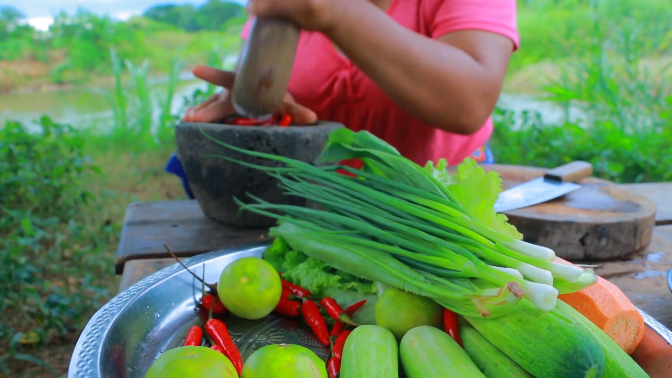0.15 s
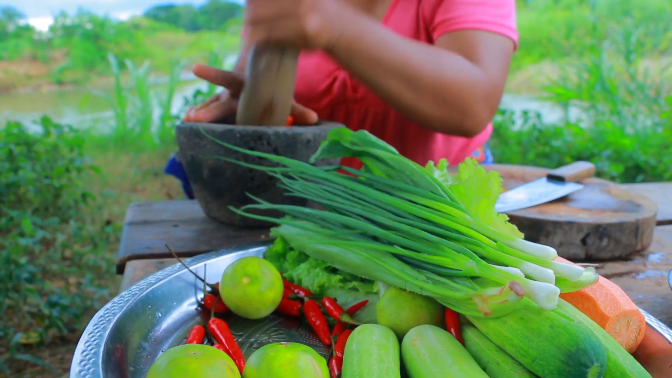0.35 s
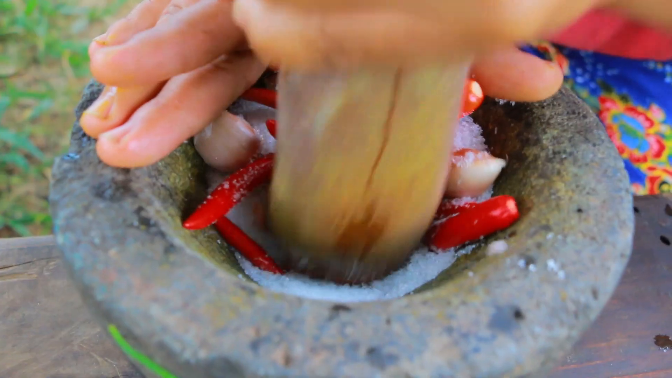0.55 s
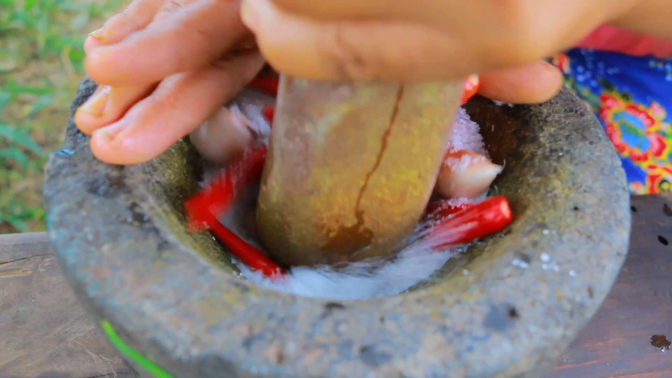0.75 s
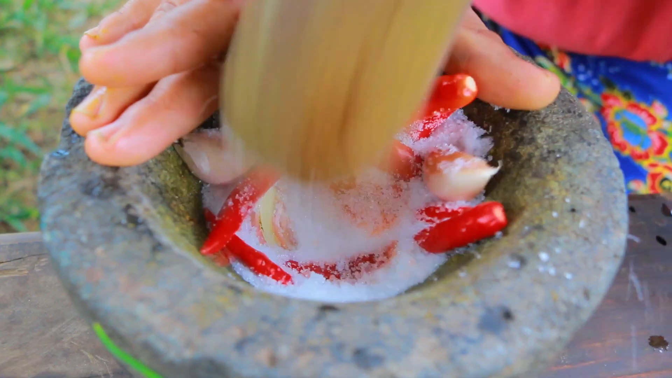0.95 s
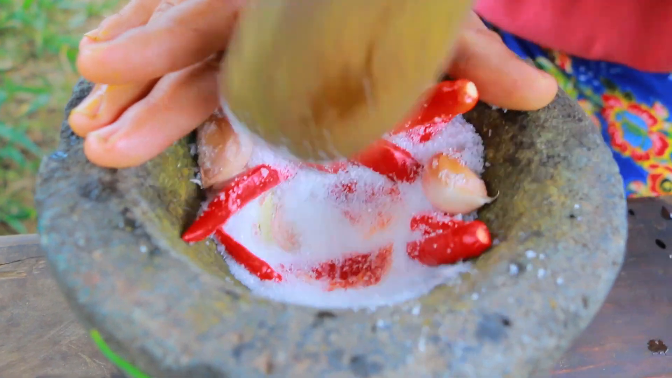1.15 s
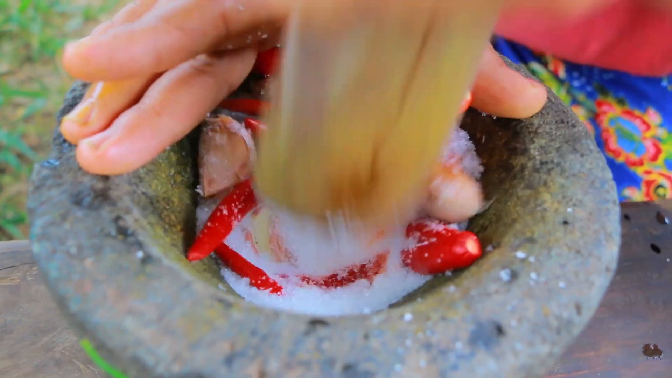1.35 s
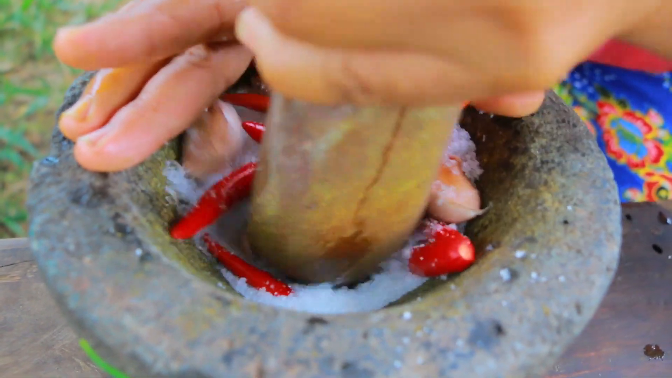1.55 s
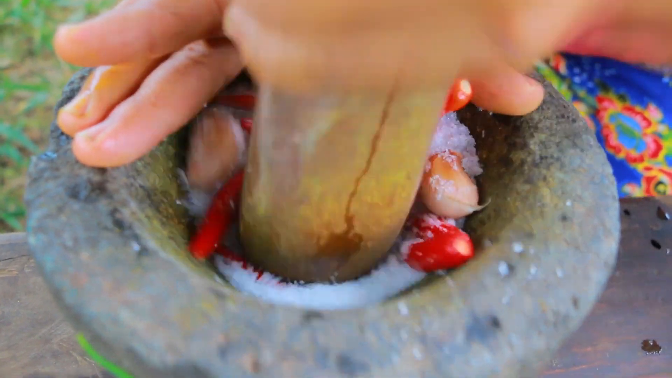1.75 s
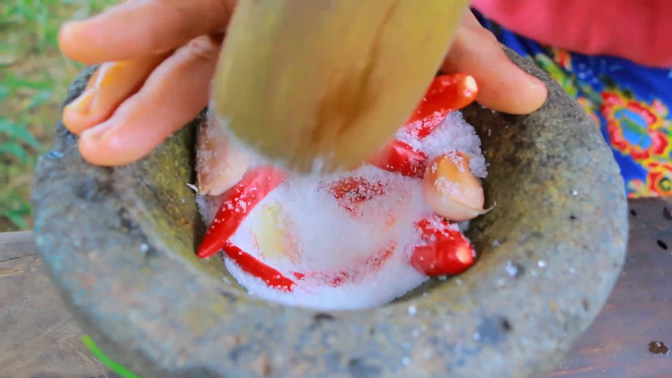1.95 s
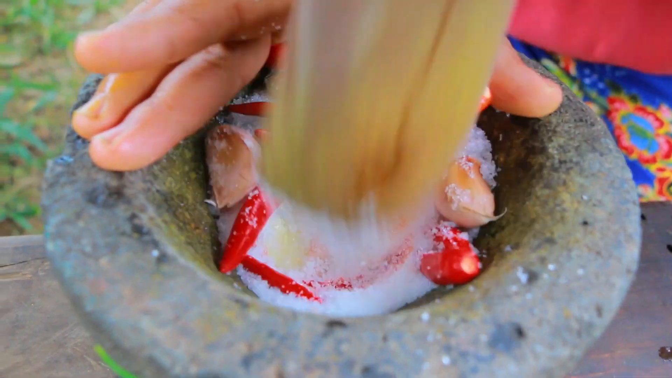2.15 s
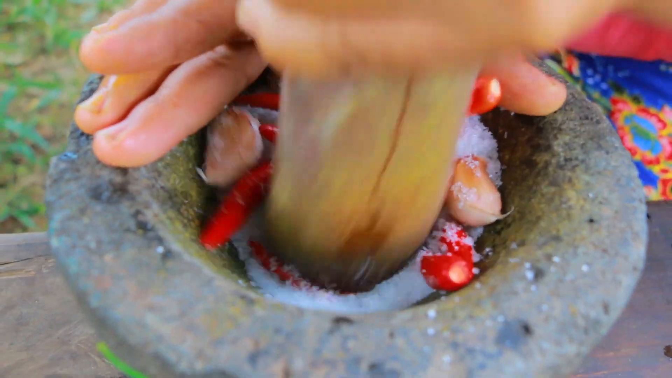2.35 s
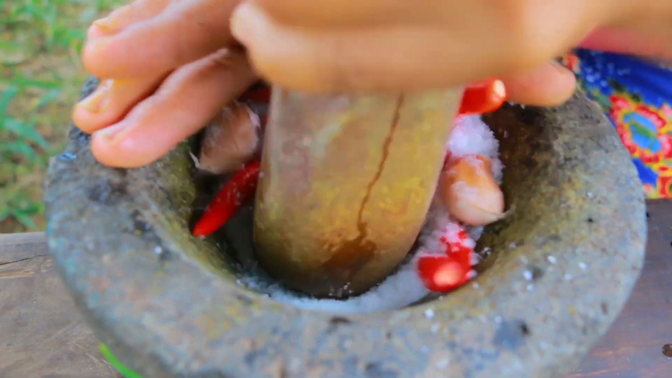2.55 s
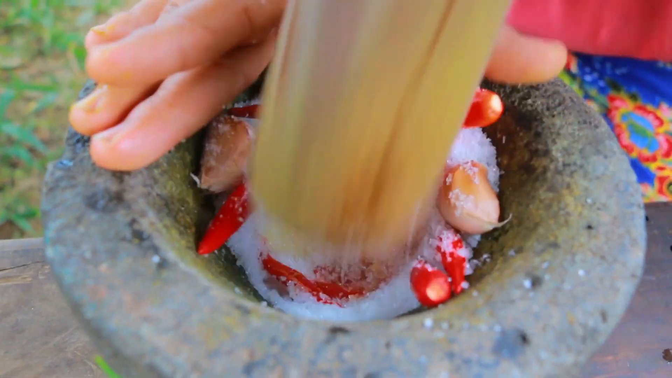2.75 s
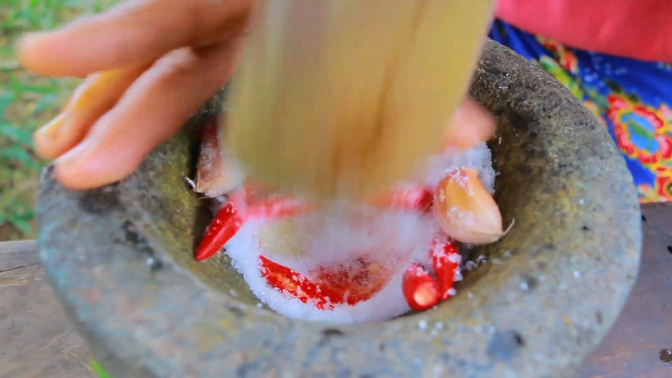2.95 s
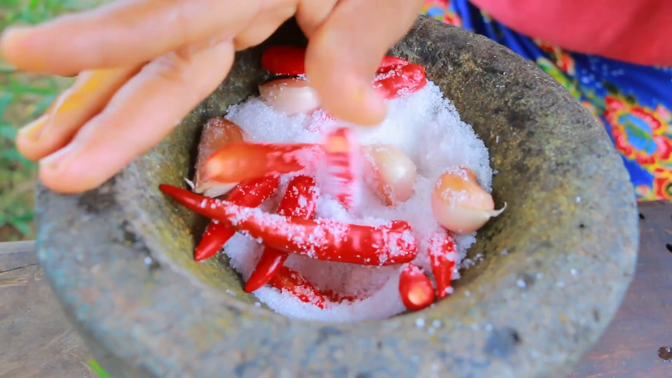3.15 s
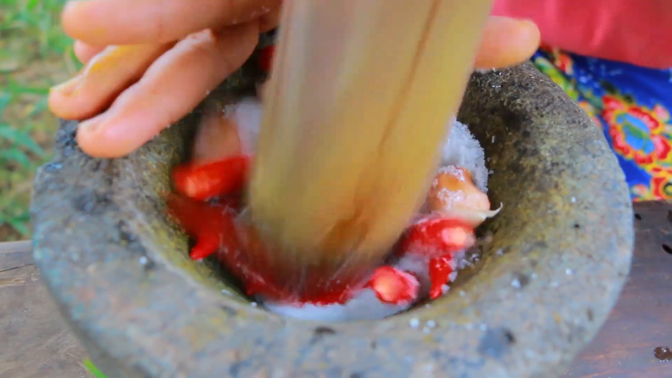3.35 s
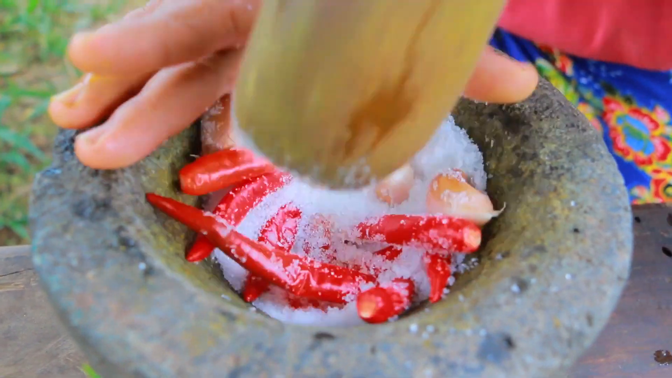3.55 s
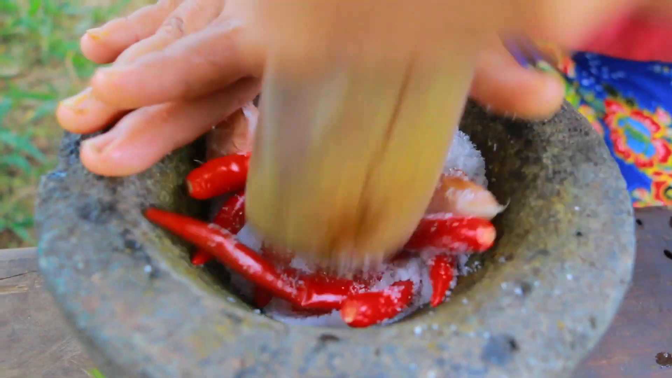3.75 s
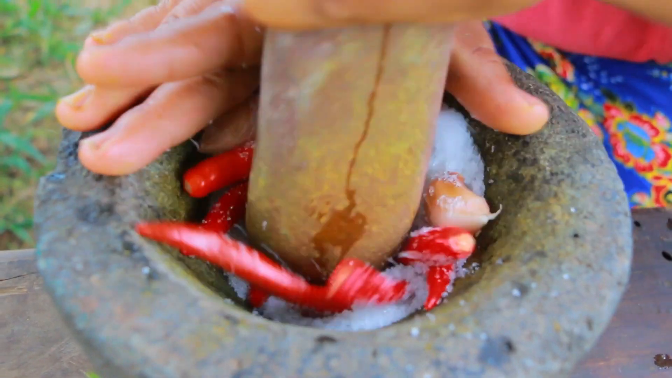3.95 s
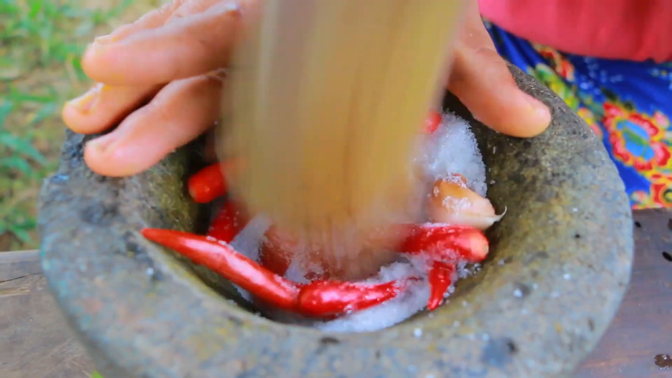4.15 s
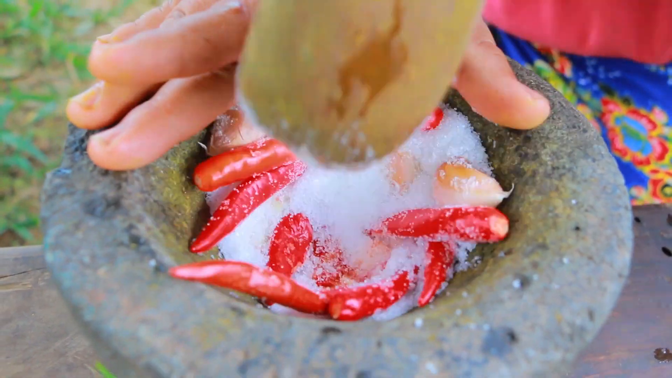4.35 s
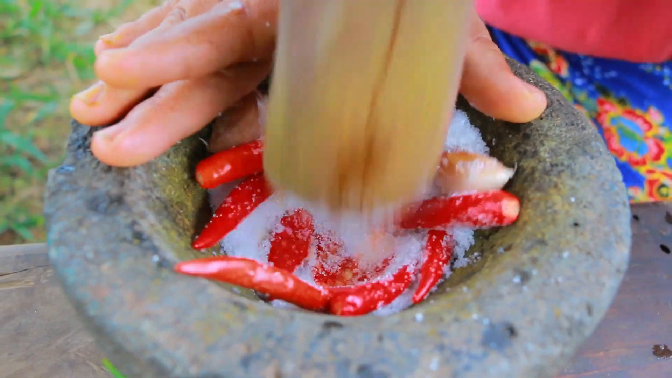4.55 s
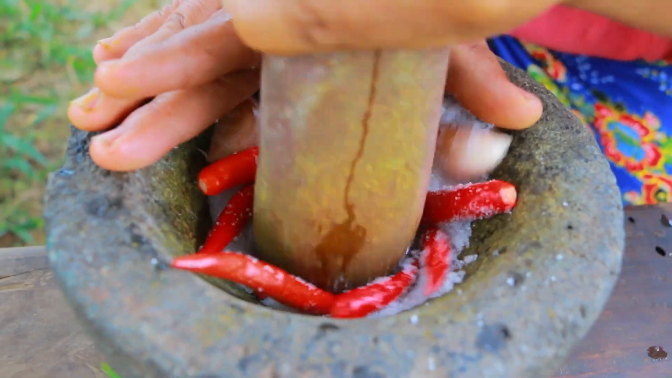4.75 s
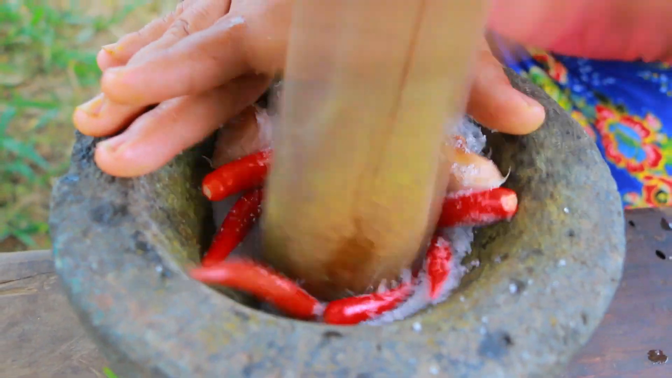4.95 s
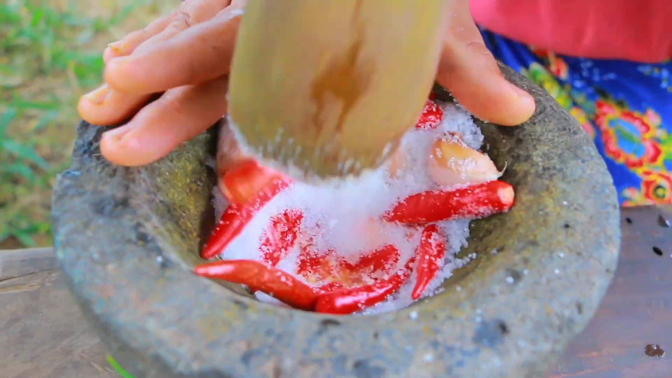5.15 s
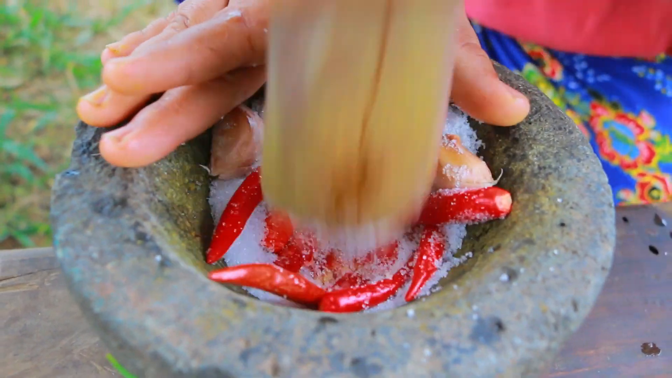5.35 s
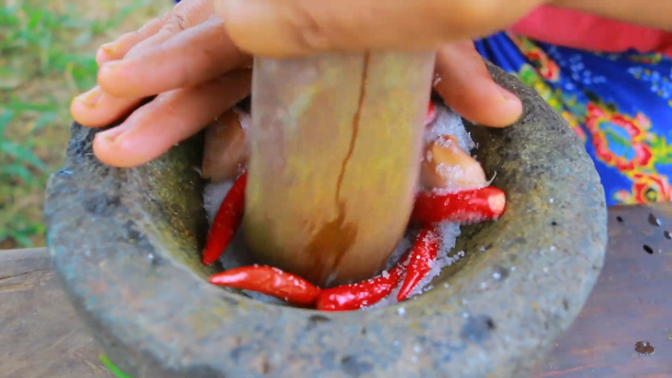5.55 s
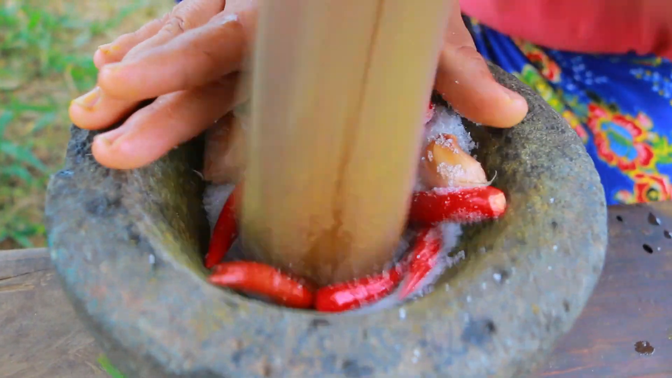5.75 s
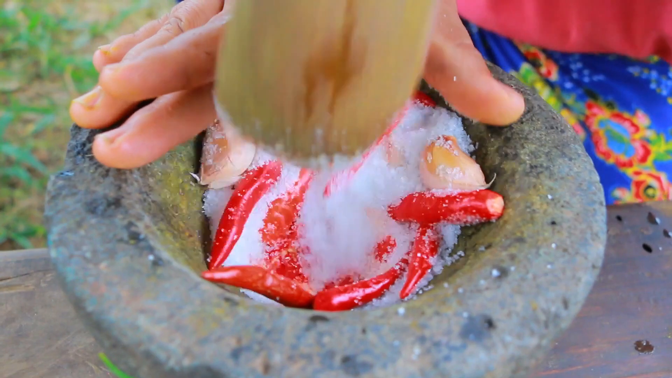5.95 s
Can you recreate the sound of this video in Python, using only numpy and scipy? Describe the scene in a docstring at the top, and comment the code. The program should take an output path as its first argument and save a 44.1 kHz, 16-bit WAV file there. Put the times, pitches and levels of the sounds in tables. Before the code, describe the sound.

Close stereo microphones, dry open air with a soft hush. Steady heavy blows of wood in stone: a short gritty salt burst, dull thump, hard woody knock, then planks booming and rattling, loose metal ticking. The first two are thinner and farther, cut by a very short silence. Around three seconds the pounding rests with low handling rumble and faint cricket, then continues strongly to the end, peaks slightly overloaded.

```python
"""A wooden pestle pounds chilies, garlic and salt in a stone mortar on a loose plank table out of doors. Close
to the microphones, each stroke is a burst of crushed salt (noise grains), a dull thump and a knock of mortar
and planks (struck resonators); the table shudders on and a small metal thing ticks (snap and ring). Far off,
narrow noise bands make a cicada and a cricket before the silence, then a throbbing cricket, over an outdoor
hush of shaped noise. A short silence falls near half a second; loud peaks pull the gain down and overload."""
import sys
import numpy as np
from scipy import signal
from scipy.fft import rfft, irfft, next_fast_len
from scipy.io import wavfile

SR = 44100
rng = np.random.default_rng(int(sys.argv[2]) if len(sys.argv) > 2 else 0)


def to_linear_factor(level_db):
    """Convert decibel levels (scalar or array-like) to linear amplitude factors."""
    exponent = np.asarray(level_db, float) / 20
    return 10 ** exponent


def unload_audio(sound):
    """Save the sound as a 16-bit wav file, at the path given as the first command line argument."""
    columns = np.transpose(np.atleast_2d(sound))
    # keep every value between -1 and 1, then stretch to whole-number steps
    steps = np.round(np.clip(columns, -1, 1) * 32767)
    wavfile.write(sys.argv[1], SR, steps.astype(np.int16))


N = 265482


def rms_one(x):
    """Scale to rms 1."""
    return x / np.sqrt(np.mean(x ** 2) + 1e-20)


def coloured(x, points, share=1):
    """Shape a spectrum by (Hz, dB) points joined on a log axis; share scales the dB."""
    hz, db = np.transpose(points)
    size = next_fast_len(N)
    grid = np.maximum(np.fft.rfftfreq(size, 1 / SR), 1)
    curve_db = np.interp(np.log(grid), np.log(hz), db)
    return irfft(rfft(x, size) * to_linear_factor(share * curve_db), size)[..., :N]


def clicks(seconds, sizes):
    """Impulses at given times."""
    out = np.full(N, 1e-18)
    places = np.round(np.asarray(seconds) * SR).astype(int)
    np.add.at(out, np.clip(places, 0, N - 1), sizes)
    return out


def ring(x, hz, t60):
    """A unit click sets a sine of height 1 ringing; it falls 60 dB in t60 seconds."""
    r, w = to_linear_factor(-60 / (t60 * SR)), 2 * np.pi * hz / SR
    return signal.lfilter([0, np.sin(w)], [1, -2 * r * np.cos(w), r * r], x)


def fade(x, t60):
    """Each click becomes a step that dies away by 60 dB in t60 seconds."""
    return signal.lfilter([1], [1, -to_linear_factor(-60 / (t60 * SR))], x)


def soften(x, hz):
    """A yielding contact: double one-pole low-pass."""
    r = np.exp(-2 * np.pi * hz / SR)
    return signal.lfilter([(1 - r) ** 2], [1, -2 * r, r * r], x)


def strike(seconds, db, modes, spread_db, chatter_s, dulling=0, count=4, shifts=(1,)):
    """Uneven surfaces touch several times in one hit, each mode getting its own strengths; soft hits are
    duller where dulling is set."""
    draw = rng.standard_normal((len(seconds), len(modes), count, 2))
    dealt = rng.integers(0, len(shifts), (len(seconds), len(modes), 1))
    late = abs(draw[..., 1]) * np.arange(count)
    favoured = draw[..., :1, 1]   # where the hit lands decides which modes it favours
    strength_db = spread_db * (0.32 * favoured + .5 * abs(draw[..., 0])) - 5.45 * late
    sizes = to_linear_factor(strength_db) * np.sign(draw[..., 0])
    out = 0
    for k, (hz, mode_db, t60) in enumerate(modes):
        times = seconds[:, None] + chatter_s * late[:, k]
        height = to_linear_factor(db + mode_db + dulling * db * np.log2(hz / 700))[:, None]
        for j, shift in enumerate(shifts):
            chosen = (dealt[:, k] == j) * sizes[:, k] * height
            out = out + ring(clicks(times, chosen), hz * shift, t60)
    return out


def grains(per_s, spread_db):
    """Random clicks of uneven size; rms 1."""
    sizes = to_linear_factor(abs(spread_db) * np.minimum(rng.exponential(1, N), 4)) * rng.choice([-1, 1], N)
    return rms_one(sizes * (rng.random(N) < per_s / SR))


# side signal against mid: pitch_hz, level_db
SIDE_DB = [(60, -16.5), (150, -27), (380, -23.5), (950, -9.5), (2380, -3), (5980, 1), (15000, -2.5)]
# left port against right: pitch_hz, level_db
BALANCE_DB = [(60, 0), (180, 0), (550, 2), (1650, -2), (4970, -2), (15000, -7.5)]


def at_microphones(x, turn, scattered):
    """Two spaced ports hear a source out of phase and with unlike close reflections, most of all in the treble."""
    close = rng.standard_normal(900) * to_linear_factor(-np.arange(900) * .06)
    reflections = signal.fftconvolve(x, close / np.linalg.norm(close))[:N]
    quarter_turn = signal.hilbert(x, next_fast_len(N)).imag[:N]
    side = coloured(turn * quarter_turn + scattered * reflections, SIDE_DB)
    left = coloured(x + side, BALANCE_DB, share=.5)
    right = coloured(x - side, BALANCE_DB, share=-.5)
    return left, right


# spectrum of the outdoor hush: pitch_hz, level_db (relative)
AIR = [(18, -26), (30, -4), (239, 2.5), (499, -7), (684, -2.5), (844, -8), (1350, -13.5), (3220, -22),
       (6550, -28), (7090, -28.5), (14800, -41.5), (16000, -41)]
# the short silence: start_s, end_s
GAP_S = (.4525, .5315)


def air():
    """Outdoor hush of leaves and distance: shaped noise, gusting a little, stronger before the silence."""
    mid, side = coloured(rng.standard_normal((2, N)), AIR)
    gusts_db = rms_one(soften(rng.standard_normal(N), 8.1))
    before = np.arange(N) < GAP_S[0] * SR
    hush = rms_one(mid + coloured(side, SIDE_DB) * [[1], [-1]])
    return to_linear_factor(-46.5) * to_linear_factor(gusts_db + 3.5 * before) * hush


def narrow_band(hz, t60):
    """Noise through two equal resonators, separate in each channel; rms 1."""
    noise = rng.standard_normal((2, N))
    return rms_one(ring(ring(noise, hz, t60), hz, t60))


# insect bands before the silence, a cicada then a cricket: pitch_hz, width_hz (of one resonator), level_db
# (relative)
EARLY_BANDS = [(4560, 380, 0), (6150, 500, -1)]
# loudness of both insects before the silence: time_s, level_db
EARLY_SWELL = [(0, -56), (0.07, -61), (0.17, -67), (0.27, -52.5), (0.33, -57.5), (0.45, -71)]


def early_insects():
    """A far cicada and cricket before the silence: two narrow noise bands that swell and fade together."""
    swell_db = np.interp(np.arange(N) / SR, *np.transpose(EARLY_SWELL), right=-200)
    bands = sum(to_linear_factor(db) * narrow_band(hz, np.log(1000) / np.pi / width_hz) for hz, width_hz, db in EARLY_BANDS)
    return to_linear_factor(swell_db) * bands


# pestle strokes: landing_s (deepest pressure dip), thump_db, crush_length_s, crush_peak_db,
# early_crush_db (against the peak); levels are relative
BLOWS = [(0.0746, -25, 0.015, -35.5, -1.5), (0.3258, -17, 0.014, -36.5, -2), (0.56, -9.5, 0.018, -28, -10),
         (0.8077, -18, 0.025, -31.5, -2), (1.0658, -14.5, 0.022, -27, -5.5),
         (1.323, -10.5, 0.022, -31, -0.5), (1.5794, -15, 0.019, -30, -4), (1.8331, -9.5, 0.014, -25, -12),
         (2.088, -14.5, 0.021, -23.5, -15), (2.3572, -12.5, 0.011, -25, 4),
         (2.614, -13.5, 0.011, -20.5, -17), (2.866, -13, 0.0092, -23, -21),
         (3.468, -16.5, 0.077, -32.5, -14.5), (3.7158, -8, 0.032, -26.5, -23),
         (3.994, -13.5, 0.023, -25.5, -5.5), (4.2556, -12.5, 0.019, -26, -5.5),
         (4.507, -8, 0.0092, -23.5, -4), (4.7776, -26, 0.014, -28.5, 1), (5.041, -13, 0.017, -21.5, -9.5),
         (5.3151, -12, 0.027, -19, -22.5), (5.584, -9, 0.013, -18, -15.5),
         (5.8494, -14.5, 0.013, -18.5, -13)]
# spectrum of crushed salt: pitch_hz, level_db (relative)
CRUSH = [(290, -46), (500, 4.5), (698, 10), (1140, 2), (2570, -0.5), (5880, -8.5), (7100, -10.5),
         (14500, -24), (16000, -31)]


def crush():
    """Salt crystals start cracking as the pestle touches the heap, burst just before it lands, then fall silent."""
    t, swell = np.arange(N) / SR, np.zeros(N)
    for s, _, length, db, early_db in BLOWS:
        start = s - length
        peak = s - 5.8 * length ** 2   # slow strokes burst earlier
        times = np.maximum.accumulate([start - .003, start + 0.001, peak - .004, peak, s, s + 0.004, s + 0.035])
        levels = db + np.array([early_db - 51, early_db - 10.5, 0.9 * early_db, 0, -7, -22, -50])
        swell += to_linear_factor(np.interp(t, times, levels, left=-200, right=-200))
    return to_linear_factor(4.0) * swell * rms_one(coloured(grains(9000, spread_db=3.0), CRUSH))


# pestle landing in the bowl: pitch_hz, level_db (relative), t60_s
THUMP = [(266, 12, 0.018), (207, -34.5, 0.11), (97, -26.5, 0.039), (62, -59, 0.04)]


def thumps():
    """The blunt pestle pushes the same way each time: pressure rises on contact, then dips deep on the rebound."""
    s, db = np.array(BLOWS)[:, :2].T
    push = soften(clicks(s - .0029, to_linear_factor(db - 4)) - clicks(s - .0012, to_linear_factor(db - 3)), 1200)
    return sum(to_linear_factor(mode_db) * ring(push, hz, t60) for hz, mode_db, t60 in THUMP)


def grit(per_s, top_hz):
    """Dull dense crackle of salt and pulp shifting in the bowl; rms 1."""
    return rms_one(soften(coloured(grains(per_s, spread_db=3.0), CRUSH), top_hz))


# mortar and planks knocking together: start_s, level_db (relative)
KNOCKS = [(0.081, -3.5), (0.0966, -16), (0.1335, -8.5), (0.1779, -34), (0.245, -34.5), (0.3295, 0.5),
          (0.379, -17), (0.4288, -21.5), (0.5639, -12.5), (0.5706, -1.5), (0.61, -22), (0.635, -17.5),
          (0.735, -51), (0.815, -3), (0.8613, -11.5), (0.8848, -19), (1.0715, -13), (1.078, -2),
          (1.125, -16), (1.1857, -32), (1.267, -35), (1.3252, -8), (1.332, -3), (1.3703, -14), (1.398, -18),
          (1.5855, -3), (1.6502, -17), (1.743, -40), (1.8354, -7.5), (1.845, -3.5), (1.9005, -15.5),
          (2.029, -37.5), (2.0946, -0.5), (2.1472, -14), (2.1875, -26.5), (2.2689, -32), (2.362, -4),
          (2.3923, -17), (2.4077, -14.5), (2.4173, -12), (2.4299, -13), (2.4676, -19), (2.617, -11.5),
          (2.6261, -4.5), (2.6435, -11.5), (2.6821, -11.5), (2.8108, -31), (2.87, -8), (2.879, -5.5),
          (2.9157, -18.5), (2.93, -15), (2.979, -33), (3.0247, -38), (3.0493, -26), (3.122, -41),
          (3.46, -20), (3.478, -16), (3.497, -29), (3.5445, -31), (3.6, -40.5), (3.65, -37.5), (3.7197, -1),
          (3.7378, -7), (3.773, -13.5), (3.7833, -15.5), (3.887, -30), (3.904, -39), (3.9988, -3),
          (4.0376, -8), (4.058, -17.5), (4.1004, -22), (4.1488, -20.5), (4.1828, -25), (4.2559, -9.5),
          (4.2627, -3.5), (4.2777, -10.5), (4.3222, -15.5), (4.346, -23), (4.404, -32), (4.444, -26),
          (4.5115, -3), (4.518, -5.5), (4.541, -17.5), (4.573, -14), (4.6888, -31.5), (4.7838, -0.5),
          (4.8044, -23), (4.828, -22), (4.8464, -17.5), (4.9382, -27.5), (4.972, -26), (4.9995, -27.5),
          (5.0492, -0.5), (5.1016, -13.5), (5.1169, -22), (5.1613, -26), (5.1965, -21.5), (5.25, -33),
          (5.3213, -5.5), (5.3373, -14), (5.356, -15.5), (5.3868, -19.5), (5.4961, -23), (5.5871, -3.5),
          (5.5974, -7), (5.6103, -8), (5.6562, -12), (5.7464, -28.5), (5.7818, -32.5), (5.8575, 0.5),
          (5.8778, -10.5), (5.9212, -13.5), (5.9452, -17.5), (5.984, -24.5)]
# hard contact of stone on wood: pitch_hz, level_db (relative), t60_s
CONTACT = [(441, -2, 0.029), (530, -1, 0.06), (634.7, -1, 0.071), (724.5, 3, 0.069), (776, -0.5, 0.034),
           (973.5, 0, 0.069), (938, 12, 0.01), (1163, -30.5, 0.13), (1278, 0.5, 0.045), (1474, -3, 0.042),
           (1630, -2, 0.054), (1973, 5, 0.021), (2486, -4.5, 0.034), (3200, -15.5, 0.016)]
# low bending modes of the planks: pitch_hz, level_db (relative), t60_s
PLANKS = [(168, -6.5, 0.14), (207.3, -1.5, 0.16), (234, -2.5, 0.21), (278.5, -0.5, 0.15),
          (330.6, -0.5, 0.15), (410, -5, 0.14)]
# load and grip change from hit to hit and shift each mode a little: pitch_ratio
MODE_SHIFTS = (0.965, 1, 1.035)


def knocks():
    """Stone meets wood: hard contact modes, a short scatter of grit and the boom of the planks."""
    s, db = np.transpose(KNOCKS)
    contact = strike(s, db - 14.5, CONTACT, spread_db=3.5, chatter_s=0.001493, dulling=0.23, shifts=MODE_SHIFTS)
    scatter = fade(clicks(s, to_linear_factor(db - 16.0)), 0.047) * grit(4000, top_hz=2880)
    boom_db = -19 + 0.65 * db   # the boom follows only a share of the knock's strength
    boom = strike(s, boom_db, PLANKS, spread_db=6.0, chatter_s=0.00299, shifts=MODE_SHIFTS)
    return contact + scatter + boom


# small wooden part of a tick or clink: pitch_hz, level_db (relative), t60_s
TICK_WOOD = [(2060, 1, .04), (2240, 1, .03), (2860, 2, .045), (2980, 2, .03), (3350, -1, .04),
             (4260, -5, .03)]


def shudder():
    """The loose table rattles on after each knock: uneven small bumps into the same wood, loose things
    clinking, grit settling."""
    s, db = np.transpose(KNOCKS)
    shake = fade(clicks(s + .003, to_linear_factor(0.97 * db)), 0.2)
    bumps = shake * grains(400, spread_db=4.0)
    low = sum(to_linear_factor(mode_db) * ring(bumps, hz, t60) for hz, mode_db, t60 in PLANKS)
    soft_bumps = soften(bumps, 1300)
    hard = sum(to_linear_factor(mode_db) * ring(soft_bumps, hz, t60) for hz, mode_db, t60 in CONTACT)
    clatter = shake * grains(120, spread_db=4.5)
    clink = sum(to_linear_factor(mode_db) * ring(clatter, hz, t60) for hz, mode_db, t60 in TICK_WOOD)
    settling = shake * grit(500, top_hz=2410)
    return to_linear_factor(-69.5) * clink + to_linear_factor(-60.5) * low + to_linear_factor(-49) * hard + to_linear_factor(-31.5) * settling


# loose metal ticking on the table: start_s, ring_db (relative), wood_db (against the ring)
TICKS = [(0.134, -38.5, 24.5), (0.4228, -26.5, 12), (0.576, -25.5, -13), (0.625, -55, 25.5),
         (0.675, -31.5, 2.5), (0.821, -32, -4), (0.8739, -24, 0), (0.893, -30.5, -1.5), (1.088, -34, -11),
         (1.157, -55, 19), (1.216, -63, 29), (1.3382, -23.5, -9), (1.3866, -36, 12), (1.646, -36, 7),
         (1.924, -54, 19), (1.943, -55.5, 28), (1.999, -50, 12), (2.1042, -16.5, -4.5), (2.153, -26, -0.5),
         (2.2197, -39, 8.5), (2.236, -46.5, -2), (2.3675, -32, 11), (2.4334, -23.5, -5), (2.4972, -36.5, 6),
         (2.6303, -14.5, -22), (2.68, -43.5, 16), (2.711, -26.5, 0), (2.9213, -27, 6), (3.7868, -28.5, 5.5),
         (3.8195, -20.5, 3), (4.0424, -26.5, 0), (4.091, -27.5, 6), (4.1262, -34.5, 9), (4.31, -16.5, -1.5),
         (4.405, -37, -3), (4.523, -22, -1), (4.573, -38, 14), (4.73, -49.5, 15), (4.8415, -18.5, 3.5),
         (4.9028, -17.5, 3.5), (4.931, -30.5, 6), (4.969, -41, 14.5), (4.9886, -24.5, 5.5),
         (5.0574, -23.5, -4), (5.1187, -27, 4.5), (5.1628, -25.5, 6.5), (5.1897, -33.5, 8.5),
         (5.243, -45.5, 12), (5.3282, -22.5, 10), (5.365, -27, 4), (5.386, -31, 9), (5.6013, -15, -10),
         (5.6238, -19, -8), (5.6433, -41, 18), (5.6536, -23, 5.5), (5.682, -29, 5.5), (5.8967, -30, -8),
         (5.919, -23, 7.5), (5.9734, -30, 7), (6.0123, -17, 1.5)]
# ring of the metal: pitch_hz, level_db (relative), t60_s
METAL = [(5900, -6, .035), (6990, -2, .035), (8180, -1, .04), (9310, -2, .02), (11780, -11, .03),
         (12810, -8, .045), (13570, -9, .045)]


def ticks():
    """Each tick is a gritty snap, a thin metal ring, a little wood and a scuff, then a rebound, mostly weaker."""
    s, db, wood_db = np.transpose(TICKS)
    luck = rng.standard_normal((len(s), 2))
    s = np.append(s, s + 0.007 * (1 + .15 * luck[:, 0]))   # every tick lands a second time, about 7 ms on
    db = np.append(db, db - 9.5 + 3.5 * luck[:, 1])
    wood_db = np.tile(wood_db, 2)
    burst = soften(fade(clicks(s, to_linear_factor(db)), 0.022), 700)
    bright = np.diff(grains(15000, spread_db=0.0), prepend=0)
    snap = burst * rms_one(soften(soften(bright, 8000), 9000))
    scuff = soften(fade(clicks(s, to_linear_factor(db + wood_db)), 0.073), 700) * grit(6000, top_hz=4000)
    metal = strike(s, db - 21, METAL, spread_db=3.5, chatter_s=.0012)
    wood = strike(s, db + wood_db - 18, TICK_WOOD, spread_db=3.0, chatter_s=.002)
    return to_linear_factor(-8.0) * snap + to_linear_factor(-14) * scuff + metal + wood


# cricket bouts: start_s, end_s, level_db
CRICKET = [(0.65, 0.8, -71), (1.66, 1.8, -76), (1.916, 2.3, -63), (3.046, 3.656, -62), (4.5, 4.864, -63)]


def cricket():
    """A far cricket: a narrow noise band throbs at an uneven 24 per second and swells through each bout."""
    t = np.arange(N) / SR
    bouts = sum(to_linear_factor(db) * np.sin(np.pi * np.clip((t - a) / (b - a), 0, 1)) ** 0.5 for a, b, db in CRICKET)
    wander = 3 * rms_one(soften(rng.standard_normal(N), 3))   # radians
    throb = .5 + np.maximum(np.sin(2 * np.pi * 24 * t + wander), 0)
    return bouts * throb * narrow_band(6430, .004)


# a hand leans on the table: centre_s, spread_s (rise and fall), level_db
LEANS = [(3.29, 0.02, -48), (3.45, 0.064, -41)]
# band of the rumble: low_hz, high_hz
LEAN_HZ = (50, 137)


def leans():
    """Brief swells of low noise through the planks as a hand leans on the table."""
    t = np.arange(N) / SR
    band = signal.butter(2, LEAN_HZ, "band", fs=SR, output="sos")
    low = signal.sosfilt(band, rng.standard_normal(N))
    swells = sum(to_linear_factor(db) * np.exp(-.5 * ((t - s) / spread_s) ** 2) for s, spread_s, db in LEANS)
    return rms_one(low) * swells


def scene():
    """Table sounds with a faint outdoor scatter behind them, over air and insects."""
    table = at_microphones(thumps() + shudder() + knocks() + leans(), turn=-1.08, scattered=0.55)
    small = at_microphones(crush() + ticks(), turn=0.93, scattered=0.28)
    near = np.add(table, small)
    # before the silence the microphone is farther off and hears less bass
    thin = signal.sosfilt(signal.butter(2, 310, "high", fs=SR, output="sos"), near)
    near = np.where(np.arange(N) < GAP_S[0] * SR, thin, near)
    yard = rng.standard_normal((2, 9000)) * to_linear_factor(-60 * np.arange(9000) / SR / 0.1)
    wet = signal.fftconvolve(near, soften(yard, 5900), axes=1)[:, :N]
    return near + to_linear_factor(-44) * wet + air() + early_insects() + cricket()


def gain_control(x, knee_db=-24, slope=0.26, release_db_s=60, attack_hz=60):
    """Loud peaks pull the gain down a little late; it creeps back between strokes."""
    ramp = release_db_s * np.arange(N) / SR
    over = np.maximum(20 * np.log10(abs(x).max(axis=0) + 1e-9) - knee_db, 0)
    held = np.maximum(np.maximum.accumulate(slope * over + ramp) - ramp, 0)
    return x * to_linear_factor(4.0 - soften(held, attack_hz))


def top_cut(x):
    """Nothing passes above the cut-off."""
    return signal.sosfilt(signal.butter(12, 16850, fs=SR, output="sos"), x)


def record(dry):
    """Microphone chain: bass cut, gain control, hard overload, top cut, then the short silence."""
    t = np.arange(N) / SR
    x = gain_control(signal.sosfilt(signal.butter(3, 45, "high", fs=SR, output="sos"), dry))
    overloaded = np.clip(x, -1, 1)
    x = signal.sosfilt(signal.cheby2(10, 30, 16200, fs=SR, output="sos"), overloaded)
    audible = (t < GAP_S[0]) | (t > GAP_S[1])
    return top_cut(np.clip(x, -1, 1) * audible)


dry = scene()
out = record(dry)
unload_audio(out)
```